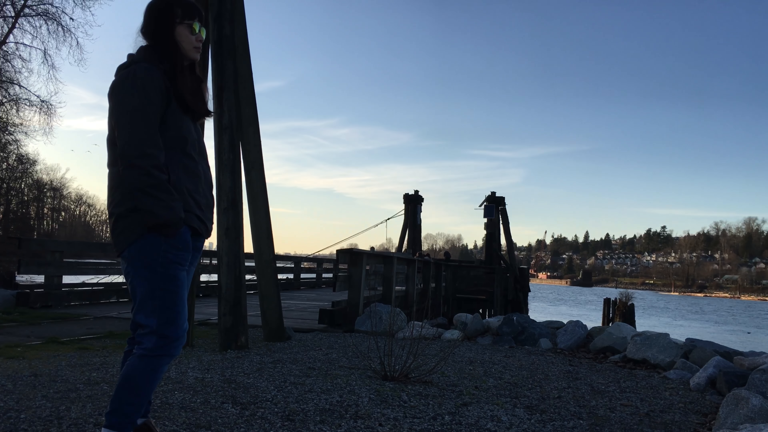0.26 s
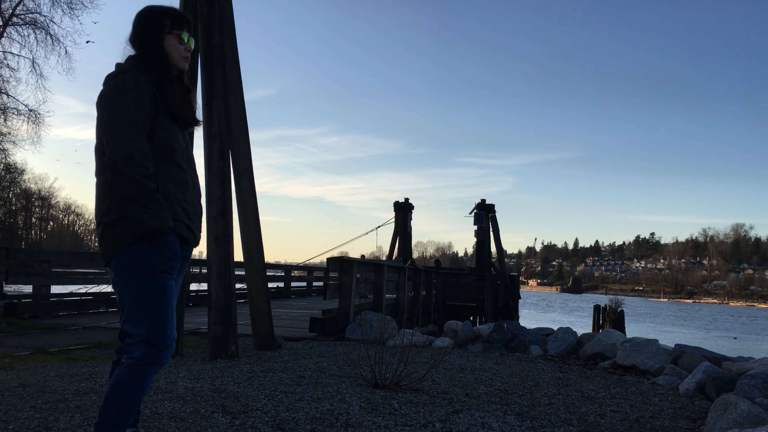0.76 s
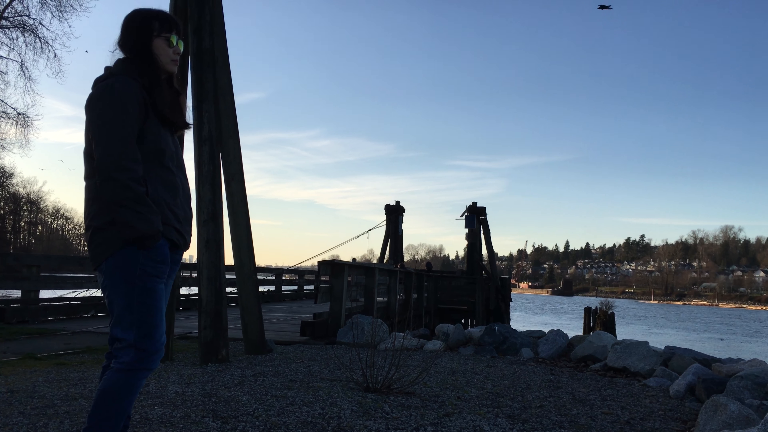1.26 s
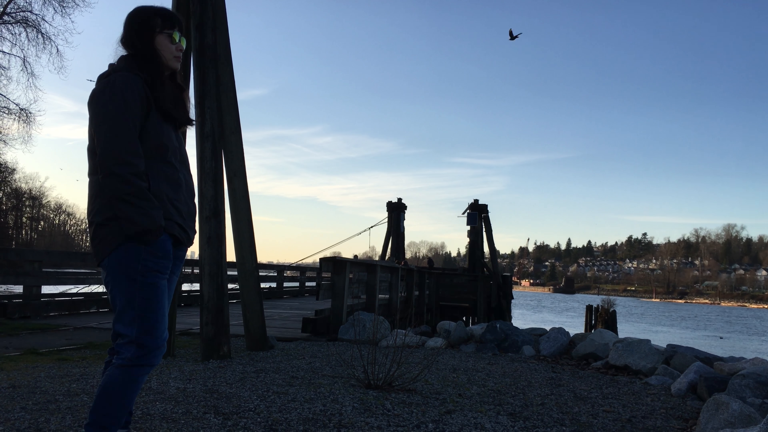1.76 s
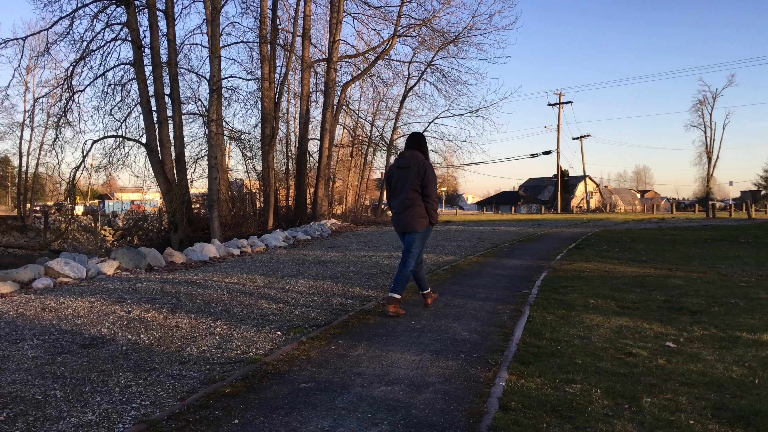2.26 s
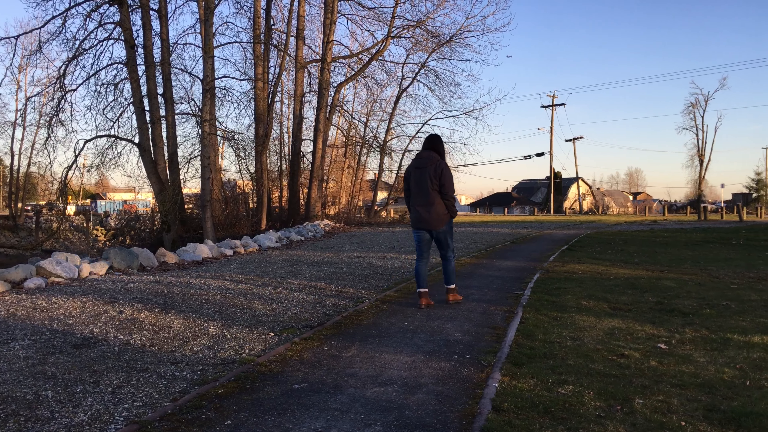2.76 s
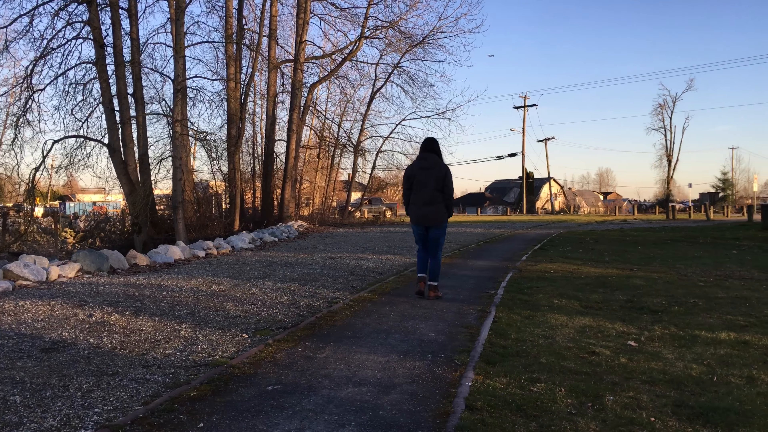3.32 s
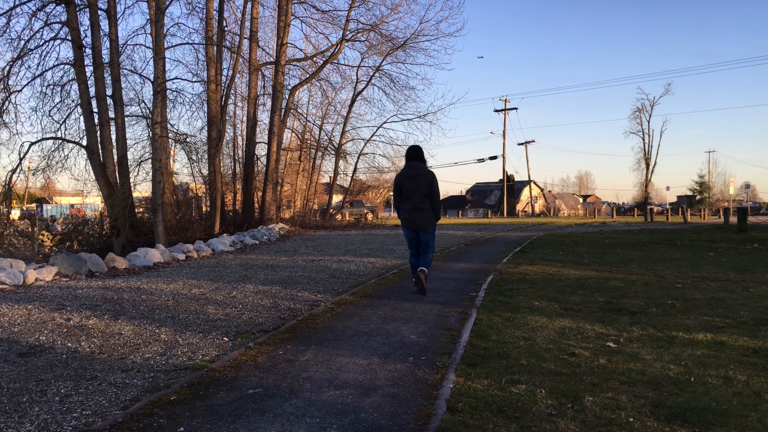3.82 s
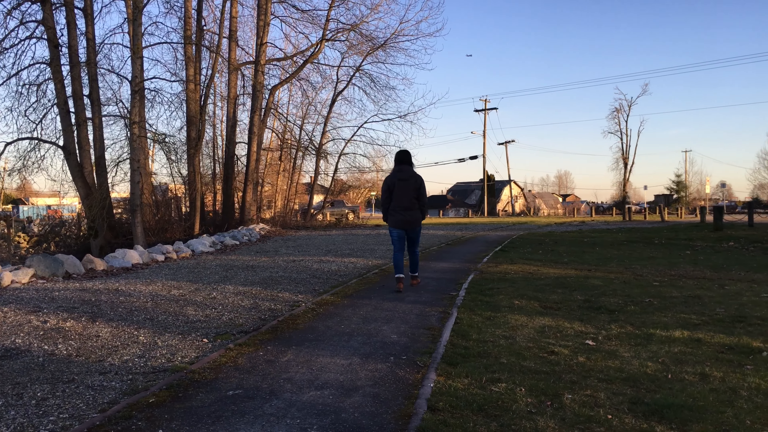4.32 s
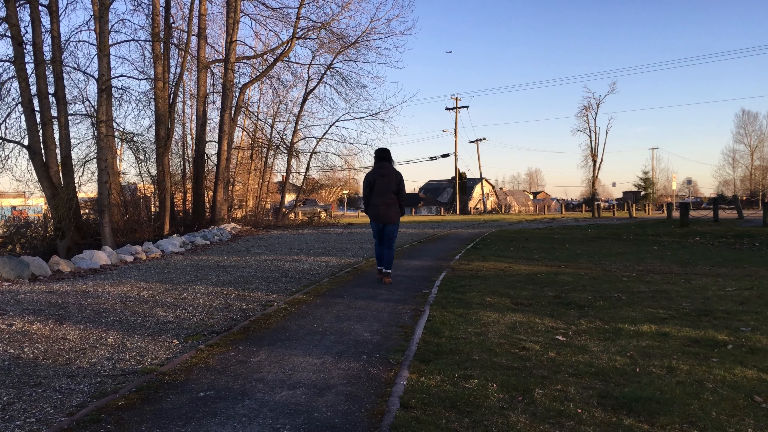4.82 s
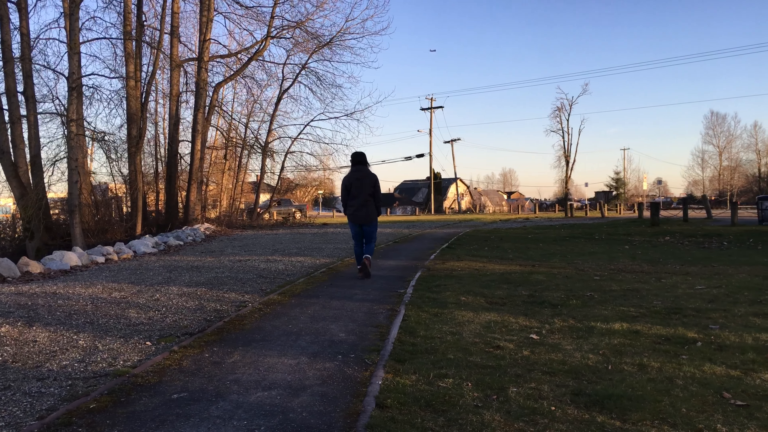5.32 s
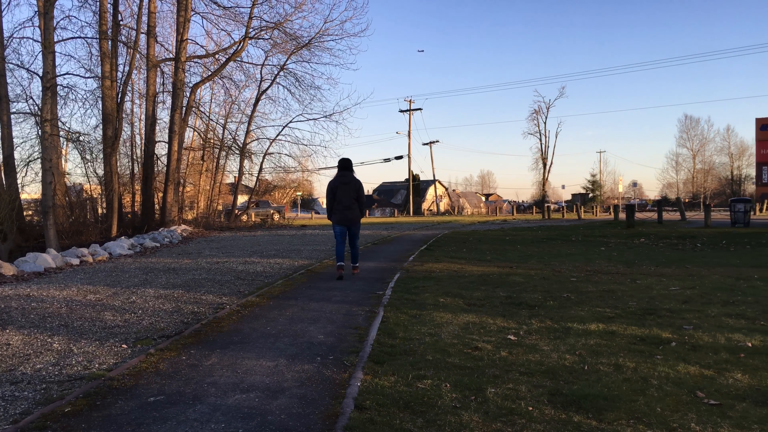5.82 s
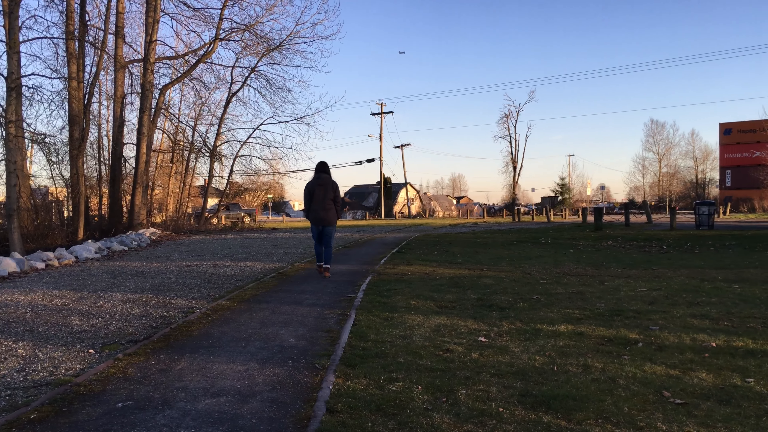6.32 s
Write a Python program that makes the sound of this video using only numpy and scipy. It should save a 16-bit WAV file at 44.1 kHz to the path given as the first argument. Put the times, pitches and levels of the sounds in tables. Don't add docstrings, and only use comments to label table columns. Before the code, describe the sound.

Close, raspy crow calls come in uneven succession over deep town rumble, with fainter higher answers and short diffuse echoes. The sound dips at a scene change, then quieter park air follows with two far caws, a low engine note climbing and wavering in loudness, droning and whining distant machinery, soft jacket rustle, light footsteps on grit and a brief high bird chirp. Handheld outdoor microphone, no speech.

```python
import sys
import numpy as np
from scipy import signal
from scipy.fft import rfft, irfft
from scipy.io import wavfile
from scipy.ndimage import uniform_filter1d

SR = 44100
rng = np.random.default_rng(int(sys.argv[2]) if len(sys.argv) > 2 else 0)


def digitize_waveform(pressure):
    field = np.atleast_2d(pressure).T
    bounded = np.clip(field, -1, 1)
    quanta = np.round(bounded * 32767).astype(np.int16)
    wavfile.write(sys.argv[1], SR, quanta)


def gain_from_decibels(decibels):
    exponent = np.asarray(decibels, float) / 20
    return 10 ** exponent


N = 289955
CUT_S = 2.276


def evened(x):
    return x / np.sqrt(np.mean(x ** 2) + 1e-20)


def read(points, hz):
    f, value = np.transpose(points)
    return np.interp(np.log(hz + 1), np.log(f + 1), value)


def unroll(rows):
    s, *columns = np.transpose(rows)
    t = np.arange(s[0], s[-1], 1 / SR)
    return s[0], [np.interp(t, s, c) for c in columns]


def add(mix, s, sound):
    part = mix[round(s * SR):][:len(sound)]
    part += sound[:len(part)]


def wander(length, hz):
    r = np.exp(-2 * np.pi * hz / SR)
    return evened(signal.lfilter([1], [1, -2 * r, r * r], rng.standard_normal(length)))


def swells(rows, calm_db):
    t = np.arange(0, N + 128, 128) / SR
    s, length, db = np.transpose(rows)[:, :, None]
    edge_share = 0.3
    edge = np.clip(np.minimum(t - s, s + length - t) / (edge_share * length), 0, 1)
    gain = gain_from_decibels(calm_db) + (gain_from_decibels(db) * np.sin(np.pi / 2 * edge) ** 2).sum(0)
    return np.interp(np.arange(N) / SR, t, 20 * np.log10(gain))


def ring(x, hz, width):
    turn = np.exp(2j * np.pi * np.cumsum(hz * np.ones(len(x))) / SR)
    r = np.exp(-np.pi * width / SR)
    smooth = signal.lfilter([(1 - r) ** 2], [1, -2 * r, r * r], x * turn.conj() + 1e-18)
    return 2 * (turn * smooth).real


def tone(hz, db, waver_hz, flutter_db):
    turns = np.cumsum(hz + waver_hz * wander(len(hz), 12.7)) / SR + rng.random()
    level = np.sqrt(2) * gain_from_decibels(db + flutter_db * wander(len(hz), 14))
    return level * signal.windows.tukey(len(hz), .05) * np.sin(2 * np.pi * turns)


def noise(spectrum, patchy_db, swell_db=0):
    frames = N // 256 + 5
    a, b, patches = rng.standard_normal((frames, 513, 3)).T
    patches = uniform_filter1d(patches, size=12, axis=0)
    patches = evened(uniform_filter1d(patches, size=12, axis=1))
    grains = (a + 1j * b) * gain_from_decibels(patchy_db * patches)
    flat = signal.istft(grains, nperseg=1024, noverlap=768)[1][:N]
    hz = np.fft.rfftfreq(N, 1 / SR)
    coloured = rfft(flat) * gain_from_decibels(read(spectrum, hz))
    bass = irfft(coloured / (1 + (hz / 70) ** 4), N)
    whole = irfft(coloured, N)
    return (whole + (gain_from_decibels(swell_db) - 1) * bass) / np.std(whole)


# (centre [Hz], width [Hz], level [dB])
THROAT_RESONANCES = [(1154, 498, 0.5), (1360, 379, 7.5), (2185, 285, 0.5), (2920, 700, -13.5),
                     (3680, 400, -9.5), (4650, 240, -13.5)]


def caw(row, top_hz, clearest, manner, roughness):
    top, rise, fall, effort_db = row
    chest_db, rasp_db, fade_db = manner
    rising, broken, sag, follow = roughness
    clear_s = .035
    s = max(top - rise, 0)
    t = np.arange(s, top + fall, 1 / SR) - top
    up, down = np.clip(1 + t / rise, 0, 1), np.clip(t / fall, 0, 1)

    before_top = np.clip((clear_s - t) / (rise + clear_s), 0, 1) ** 1.5
    hz = top_hz * (1 - sag * (before_top + down))
    beak = (hz / 512) ** follow

    rough = np.interp(t / clear_s, [-2, -1, 1, 2], [rising, clearest, clearest, broken])
    turns = np.cumsum(hz * (1 + .045 * rough ** 1.5 * wander(len(hz), 70))) / SR
    folds = sum(np.cos(2 * np.pi * k * turns) for k in range(1, 19))
    puffs = (0.24 + np.exp(-(turns % 1) / 2.2)) * rng.standard_normal(len(hz))

    rattle_hz = 58 * (1 + 0.2 * wander(len(hz), 3.4))
    beat = 1 + 0.23 * np.sin(2 * np.pi * np.cumsum(rattle_hz) / SR)
    clear = beat * (1 - rough) * evened(folds)
    hoarse = beat * rough * evened(puffs)

    parts = []
    for k, (f, width, db) in enumerate(THROAT_RESONANCES):
        rung = ring(clear, f * beak, width) + 1.35 * ring(hoarse, f * beak, 2 * width)
        parts.append((-1) ** k * gain_from_decibels(db) * rung)
    upper = sum(parts[2:])
    chest_lingers = 0.48
    chest = gain_from_decibels(chest_db - chest_lingers * fade_db * down) * sum(parts[:2])
    core_db = 4.5 * np.exp(-(t / clear_s) ** 2)
    core = (gain_from_decibels(core_db) - 1) * parts[4]
    rasp = evened(ring(clear + hoarse, 6650, 2600))
    voice = (chest + upper + core) / np.std(upper) + gain_from_decibels(rasp_db) * rasp
    envelope = np.sin(np.pi / 2 * up) ** 2 * np.minimum(8 * (1 - down), 1)
    return s, gain_from_decibels(effort_db + fade_db * down) * envelope * voice


# (frequency [Hz], t60 [s])
BANK_DECAY = [(800, 0.47), (3000, 0.6), (8000, 1.4)]


def banks(x):
    taps = np.zeros(SR)
    at = np.arange(500, SR - 20, 20)
    taps[at + rng.integers(0, 20, len(at))] = rng.choice([-1., 1.], len(at))
    hz, t, z = signal.stft(taps, SR, nperseg=256)
    decay = gain_from_decibels(-60 * t / read(BANK_DECAY, hz)[:, None])
    tail = signal.istft(z * decay, SR, nperseg=256)[1]
    return signal.fftconvolve(x, tail / np.linalg.norm(tail))[:N]


# (loudest [s], rise [s], fall [s], effort [dB])
NEAR_CAWS = [
    (.045, 0.076, .26, -54),
    (.455, 0.086, 0.15, -55.5),
    (.97, .11, 0.26, -55),
    (1.265, 0.088, 0.46, -58),
    (1.959, .085, 0.27, -59.5),
]
# (loudest [s], rise [s], fall [s], effort [dB])
SECOND_CAWS = [
    (1.05, .04, 0.057, -73),
    (1.4, .07, 0.15, -65),
    (2.07, .1, 0.135, -65),
]
# (loudest [s], rise [s], fall [s], effort [dB])
DISTANT_CAWS = [
    (2.46, 0.074, .075, -68.5),
    (2.62, 0.049, 0.16, -68.5),
]
# (pitch [Hz], roughness [0-1])
NEAR_TOPS = [(514, .44), (514, .52), (519, .4), (532, .4), (525, .52)]
SECOND_TOPS = [(725, .4), (785, .42), (464, .48)]
DISTANT_TOPS = [(446, .38), (446, .42)]


def crows():
    near, far = np.zeros((2, N))
    flock = [(near, NEAR_CAWS, NEAR_TOPS, (0, -14.5, -23.5), (.82, .9, .07, .7)),
             (near, SECOND_CAWS, SECOND_TOPS, (0, -11, -11), (.42, .6, .04, .1)),
             (far, DISTANT_CAWS, DISTANT_TOPS, (-14, -20, -3.5), (.5, .42, .01, .02))]
    for place, caws, tops, manner, roughness in flock:
        for row, (top_hz, clearest) in zip(caws, tops):
            add(place, *caw(row, top_hz, clearest, manner, roughness))
    far = ring(far, 4000, 2300)
    near = (near + gain_from_decibels(-2) * banks(near)) * (np.arange(N) < CUT_S * SR)
    return near + gain_from_decibels(5) * far


# (time [s], firing note [Hz], level [dB])
ENGINE_RUN = [(2.3, 50.7, -50), (2.42, 57, -31), (2.59, 64.7, -32), (2.74, 69, -32), (3.0, 70, -34),
              (3.11, 71.8, -29), (3.7, 76.5, -27), (4.05, 80.3, -27), (4.35, 84, -35), (4.51, 85.1, -32),
              (5.0, 87, -37), (5.24, 91.4, -35), (5.36, 87.4, -35), (5.6, 86, -42)]
# (time [s], depth [dB], half width [s])
ECHO_NULLS = [
    (3.26, -16, .035),
    (3.585, -32, .06),
    (4.0, -20, .045),
    (4.3, -6, .08),
    (4.61, -16, .08),
    (4.82, -12, .1),
    (5.11, -16, .07),
    (5.3, -15, .04),
    (5.43, -25, .06),
]


def engine():
    s, (hz, db) = unroll(ENGINE_RUN)
    t = s + np.arange(len(hz)) / SR
    for at, depth_db, half in ECHO_NULLS:
        db = db + depth_db * np.maximum(1 - abs(t - at) / half, 0) ** 2
    out = np.zeros(N)
    add(out, s, tone(hz, db, 0.85, 0.18))
    return out


def whine(rows, hz):
    t = np.arange(N) / SR
    sinking_hz = hz * (1 - .0045 * (t - 3))
    return (t > CUT_S) * tone(sinking_hz, swells(rows, -78), 1.24, 0.57)


# (start [s], length [s], level [dB])
LOW_WHINE = [
    (2.36, 0.57, -66.5),
    (2.78, 0.26, -60.5),
    (3.032, .4, -59.5),
    (3.446, 0.33, -64),
    (3.935, 0.22, -66.5),
    (4.7, 0.38, -68),
    (5.138, 0.83, -66.5),
    (5.945, 0.45, -62.5),
    (6.36, .2, -64),
]
# (start [s], length [s], level [dB])
MIDDLE_WHINE = [
    (2.55, 0.63, -58),
    (3.0, 0.65, -58),
    (4.15, 0.31, -62.5),
    (4.76, .12, -74),
    (4.95, 0.33, -60),
    (5.22, 0.79, -62.5),
    (6.03, .35, -63.5),
    (6.4, 0.46, -53),
]
# (start [s], length [s], level [dB])
HIGH_WHINE = [(2.5, .6, -63), (2.8, .75, -58.5), (3.45, .5, -70), (4.05, .23, -65), (4.35, .36, -66),
              (4.74, .25, -66), (5.03, .22, -63), (5.28, .24, -69), (5.6, .2, -70), (5.86, .17, -66),
              (6.03, .42, -63)]


def far_machine():
    three = whine(LOW_WHINE, 683) + whine(MIDDLE_WHINE, 754) + whine(HIGH_WHINE, 889)
    return three + gain_from_decibels(-2.5) * whine(HIGH_WHINE, 889 + 15)


# (start [s], length [s], level [dB])
STRIDES = [(2.38, .2, -72.5), (2.63, .19, -74.5), (2.9, 0.053, -77), (3.02, 0.2, -71), (3.29, .16, -76),
           (3.55, .1, -82), (3.71, 0.24, -74.5), (3.98, .14, -77), (4.26, 0.53, -77), (5.1, 0.36, -74.5),
           (5.44, .18, -77), (5.7, 0.36, -86), (5.88, 0.54, -76.5), (6.36, 0.1, -82)]
# (frequency [Hz], level [dB per Hz])
CLOTH_COLOUR = [(1000, -7), (2500, -1), (5000, -5), (8000, 5), (12000, 1), (16000, -3.5)]


def rustle():
    rub = noise(CLOTH_COLOUR, 0.78) * gain_from_decibels(1.7 * wander(N, 27))
    in_park = np.arange(N) > CUT_S * SR
    return in_park * gain_from_decibels(swells(STRIDES, -87.5)) * evened(rub)


# (time [s], strength [dB], centre [Hz], width [Hz], t60 [s])
GRIT_TICKS = [(.1055, -46, 4500, 6000, .03), (.1068, -42, 13500, 6000, .006), (.301, -59, 5200, 4000, .015),
              (1.815, -63, 7000, 4000, .015), (2.355, -57, 8000, 2200, .015),
              (2.95, -62, 11500, 5000, .008), (3.599, -53, 7300, 1500, .012),
              (3.753, -50, 2400, 4000, .009), (2.445, -52, 1900, 1300, .03), (3.13, -60, 1800, 1500, .08),
              (3.8, -58, 1700, 1600, .12), (4.49, -53, 1800, 1500, .06), (5.26, -58, 2000, 1500, .2),
              (5.945, -63, 2500, 2600, .3), (6.3, -67, 3100, 700, .4)]


def grit():
    out, t = np.zeros(N), np.arange(9000) / SR
    for s, db, hz, width, t60 in GRIT_TICKS:
        band = evened(ring(rng.standard_normal(len(t)), hz, width))
        add(out, s, band * gain_from_decibels(db - 60 * t / t60) * np.minimum(8 * t / t60, 1))
    return out


# (time [s], pitch [Hz], level [dB])
BIRD_CHIRP = [
    (6.04, 7400, -84),
    (6.052, 7680, -69.5),
    (6.062, 7800, -70),
    (6.078, 7900, -76),
    (6.09, 7900, -80),
    (6.13, 7880, -87),
]


def small_bird():
    out = np.zeros(N)
    s, (hz, db) = unroll(BIRD_CHIRP)
    chirp = tone(hz, db, 70, 4.5)
    add(out, s, chirp)
    add(out, s + .013, gain_from_decibels(-5) * chirp)
    return out


# (start [s], length [s], level [dB])
LOW_DRONE_SWELLS = [
    (2.6, 1.0, -71),
    (3.8, 0.23, -51.5),
    (4.25, 0.53, -45.5),
    (5.4, .8, -53.5),
    (6.1, 0.79, -43),
]
# (start [s], length [s], level [dB])
HIGH_DRONE_SWELLS = [
    (2.35, 0.83, -52),
    (3.5, 0.18, -54.5),
    (3.8, 0.59, -61.5),
    (4.55, 0.49, -48.5),
    (5.0, 0.53, -49),
]


def drones():
    white = rng.standard_normal(N)
    low_db, high_db = swells(LOW_DRONE_SWELLS, -63.5), swells(HIGH_DRONE_SWELLS, -66)
    hums = [(127.5, low_db - 1), (180.05, high_db + 1), (216.8, high_db - 10.5)]
    return sum(gain_from_decibels(db) * evened(ring(white, hz, 3.08)) for hz, db in hums)


def shimmer():
    throb_db = 2.5 * wander(N, 50)
    return gain_from_decibels(-80 + throb_db) * evened(ring(rng.standard_normal(N), 6330, 1100))


# (start [s], length [s], level above calm [dB])
RUMBLE_GUSTS = [(0.02, 0.28, 5), (.5, 0.46, 6.5), (.92, 0.43, 0.5), (1.1, 0.58, 6.5), (1.75, 0.39, 7.5),
                (2.43, 0.16, 5), (2.64, .18, 5), (3.0, 0.71, 3), (3.85, .35, 5), (5.0, 0.4, -4),
                (5.36, 0.78, 2)]


def rumble_db():
    return swells(RUMBLE_GUSTS, 1) - 4.5


# (frequency [Hz], level [dB per Hz])
RIVER_AIR = [(12, -39), (20, 11), (37, -5.5), (81, -4.5), (93, -7.5), (116, -16.5), (171, -13),
             (240, -22.5), (268, -28), (344, -29.5), (374, -32), (468, -34.5), (1050, -29.5), (2950, -54.5),
             (15700, -65.5)]
# (frequency [Hz], level [dB per Hz])
PARK_AIR = [(12, -27), (20, -15.5), (65, 7.5), (98, 0), (186, -7), (317, -23), (495, -27), (752, -25.5),
            (1600, -32.5), (2050, -41), (4610, -56.5), (6270, -52), (7620, -57.5), (9260, -52.5),
            (15700, -59)]


def air():
    swell_db = rumble_db()
    river = gain_from_decibels(-34.5) * noise(RIVER_AIR, 1.6, swell_db + 0.5)
    park = gain_from_decibels(-37) * noise(PARK_AIR, 0.83, swell_db) + drones() + shimmer()
    return np.where(np.arange(N) / SR < CUT_S, river, park)


def scene():
    t = np.arange(N) / SR - CUT_S
    fade_out_s, fade_in_s = .022, .03
    fade = np.clip(np.maximum(-t / fade_out_s, t / fade_in_s), .03, 1)
    sources = crows() + engine() + far_machine() + rustle() + grit() + small_bird() + air()
    return (fade * sources)[None]


def top_cut(x):
    return signal.sosfilt(signal.butter(12, 15890, fs=SR, output="sos"), x)


# (frequency [Hz], level [dB])
MICROPHONE_COLOUR = [(15, -44), (28, -23), (35, -5), (42, -1), (2000, 0.5), (3200, 3), (4400, 0.5),
                     (5500, 0.8), (7800, -3), (9700, 0.5), (10400, -5), (11100, 0), (13500, 2),
                     (16000, 4.5)]


def record(dry):
    colour_db = read(MICROPHONE_COLOUR, np.fft.rfftfreq(N, 1 / SR))
    coloured = irfft(rfft(dry) * gain_from_decibels(colour_db), N)
    return top_cut(coloured)


dry = scene()
out = record(dry)
digitize_waveform(out)
```